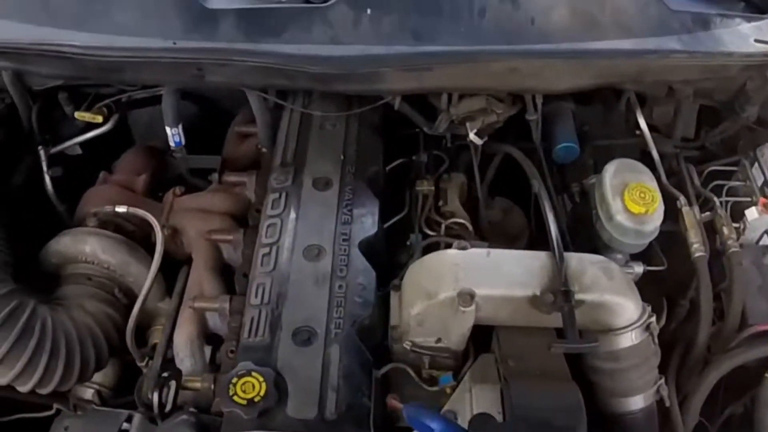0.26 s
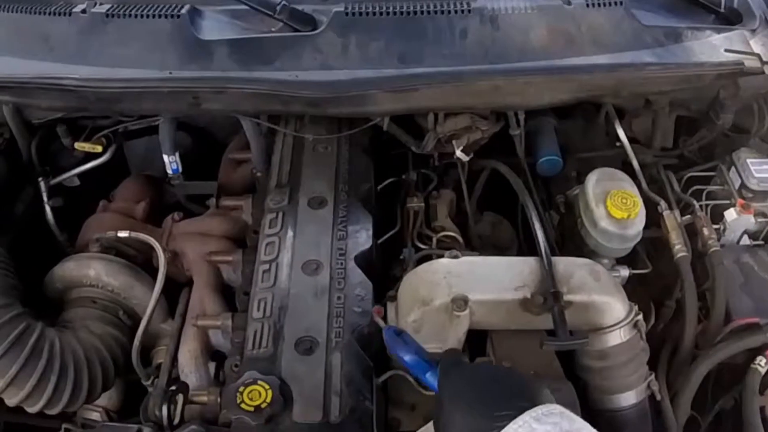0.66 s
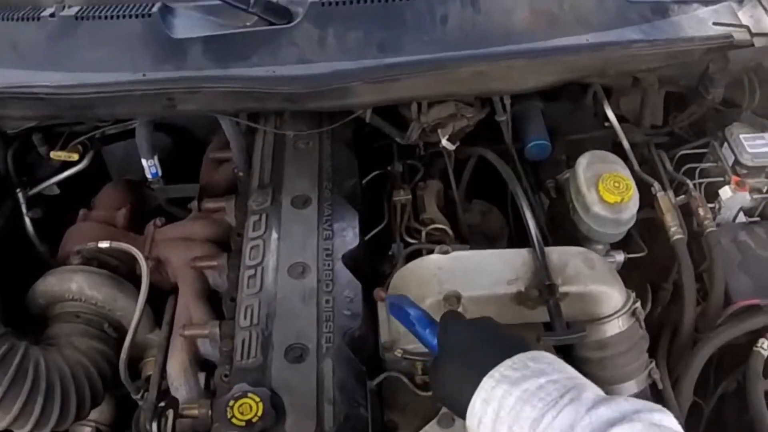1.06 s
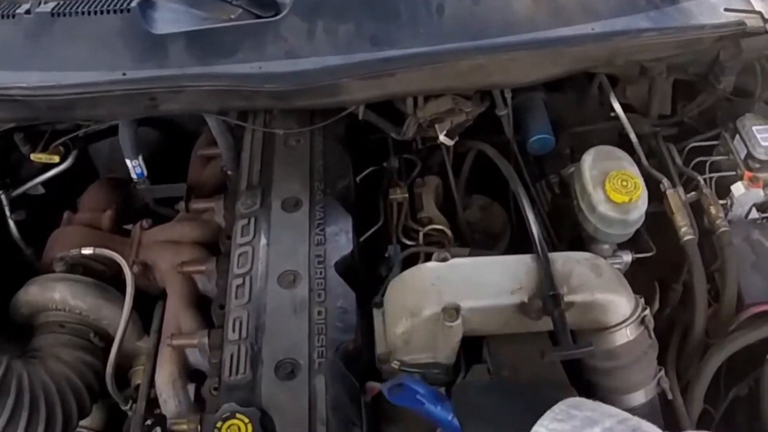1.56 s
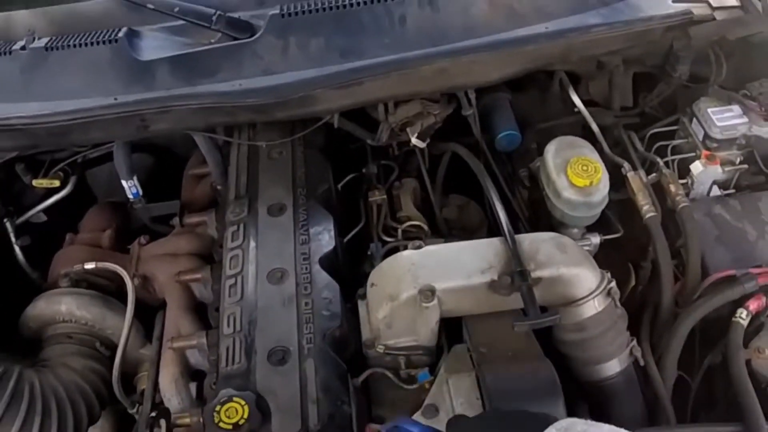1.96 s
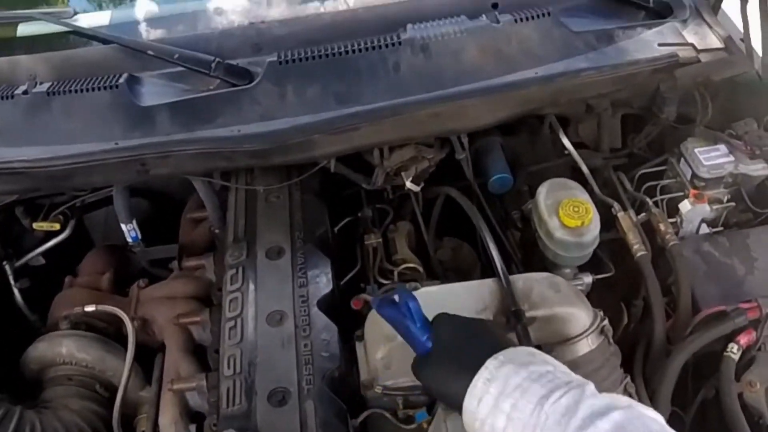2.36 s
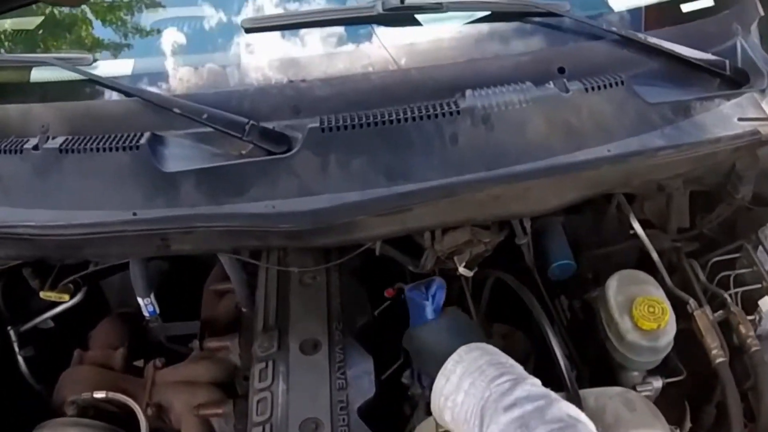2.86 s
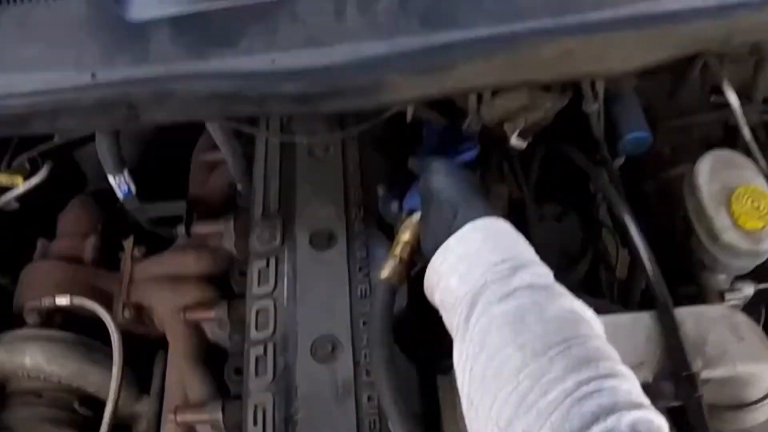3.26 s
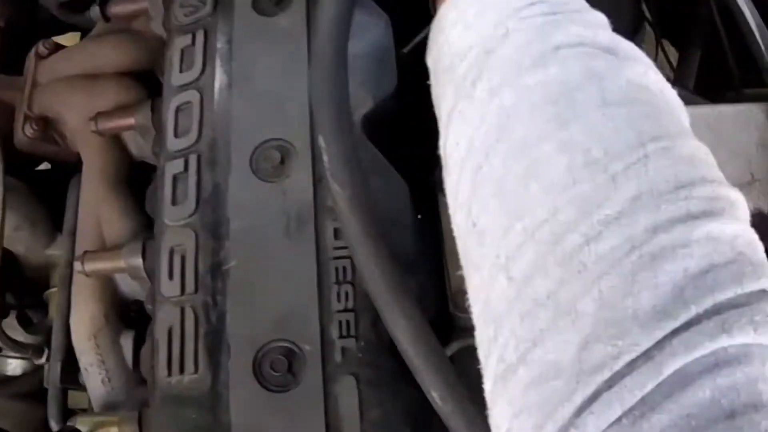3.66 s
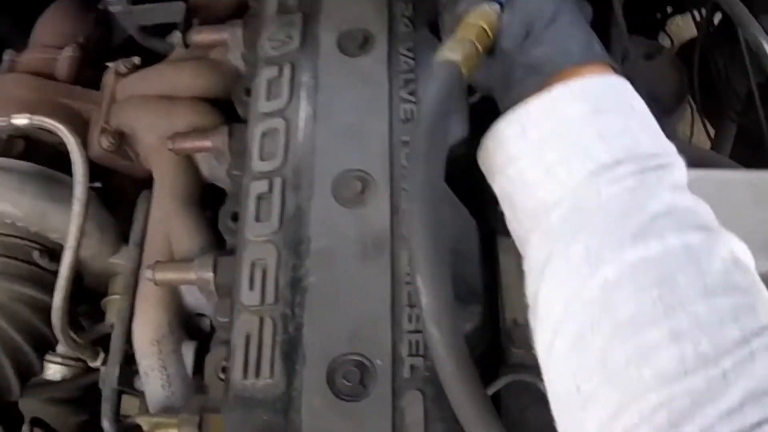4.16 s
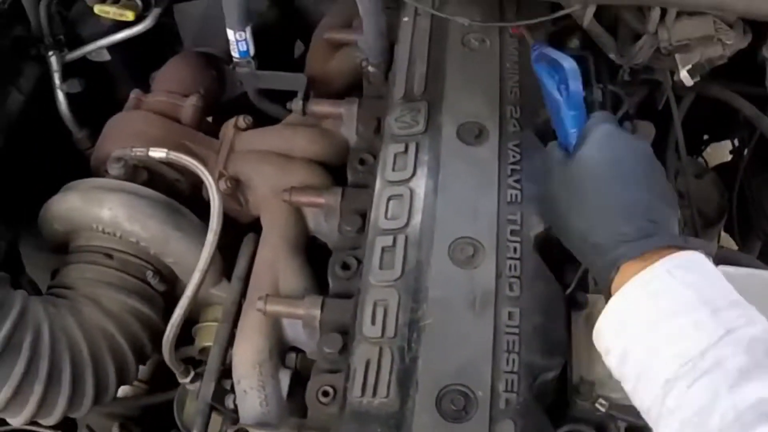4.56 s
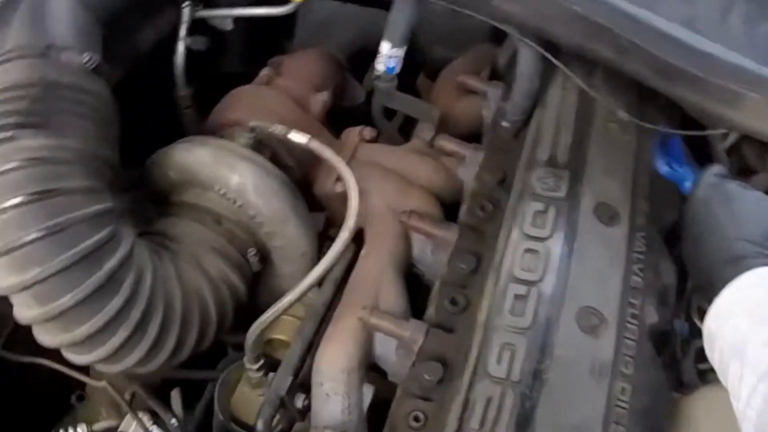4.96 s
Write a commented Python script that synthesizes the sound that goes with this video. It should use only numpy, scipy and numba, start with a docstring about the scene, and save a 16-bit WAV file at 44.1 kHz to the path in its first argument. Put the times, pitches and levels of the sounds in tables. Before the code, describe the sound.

Close, continuous air blasts sweep across metal engine parts, fluttering between sharp hiss and hollow roar, with small pops, grit ticks and late rumble.

```python
"""Air gun over an engine

A compressed-air blow gun is swept in strokes and flicks over a truck engine, an arm's length from a small camera.
Shaped noise makes its hiss at the nozzle, its rush on metal and its roar in the hollows between the parts.
Later it is pushed deep behind the valve cover: the roar drops in pitch and low noise buffets the microphone.
Sparse impulses tick like loosened grit, and delayed copies with wandering paths are echoes off nearby metal.
Short tuned flares and brief swelling tones mark edges and pockets; three times the level dips briefly."""
import sys
import numpy as np
from scipy import signal
from scipy.fft import rfft, irfft, next_fast_len
from scipy.io import wavfile
from scipy.ndimage import uniform_filter1d
from numba import njit

SR = 44100
rng = np.random.default_rng(int(sys.argv[2]) if len(sys.argv) > 2 else 0)


def output_pcm(signal):
    """Save a mono or channel-first signal as 16-bit PCM at the path in sys.argv[1].

    Samples are clipped to [-1, 1] before scaling.
    """
    pcm = np.clip(np.atleast_2d(signal).T, -1, 1) * 32767
    wavfile.write(sys.argv[1], SR, np.round(pcm).astype(np.int16))


N = 229981
TIME = np.arange(N) / SR  # seconds
FFT_SIZE = next_fast_len(N, real=True)
BIN_HZ = np.maximum(np.arange(FFT_SIZE // 2 + 1) * SR / FFT_SIZE, 1)


def undb(db):
    """Decibels to gain."""
    return 10 ** (np.asarray(db) / 20)


def curves(table):
    """Each column of a table, joined by straight lines in time."""
    s, *columns = np.transpose(table)
    return [np.interp(TIME, s, column) for column in columns]


def unit(x):
    """Scale to an rms of one."""
    return x / np.sqrt(np.mean(x ** 2))


def steady(x):
    """Hold the slow level of the mid channel at one, averaged over about 0.2 s."""
    return x / np.sqrt(uniform_filter1d(x[0] ** 2, size=9000))


def swell(s, half_length):
    """A rounded (Gaussian) rise and fall about the time s."""
    distance = np.minimum(np.abs(TIME - s) / half_length, 10)
    return np.exp(-.5 * distance ** 2)


def walk(rate):
    """Smooth random wandering with a spread of one and about `rate` turns a second."""
    slow = rfft(rng.standard_normal(FFT_SIZE)) / (1 + (BIN_HZ / rate) ** 4)
    return unit(irfft(slow, FFT_SIZE)[:N])


def colour(x, spectrum):
    """Filter by (Hz, dB) points joined on a log-frequency axis."""
    hz, db = np.transpose(spectrum)
    gain = undb(np.interp(np.log(BIN_HZ), np.log(hz), db))
    return irfft(rfft(x, FFT_SIZE) * gain, FFT_SIZE)[..., :N]


@njit
def band(x, hz, width):
    """State-variable band-pass with a moving centre, gain one at the centre."""
    y = np.empty_like(x)
    for c in range(len(x)):
        b, low = 0., 0.
        for i in range(len(hz)):
            g, k = np.tan(np.pi * hz[i] / SR), width / hz[i]
            v = (b + g * (x[c, i] - low)) / (1 + g * (g + k))
            b, low, y[c, i] = 2 * v - b, low + 2 * g * v, k * v
    return y


def bell(x, hz, width_hz, db):
    """Raise or lower a band; its centre and gain may move."""
    return x + (undb(db) - 1) * band(x, hz * np.ones(N), float(width_hz))


# Stereo width of the raw noise. Each row: frequency in Hz, side relative to mid in dB.
WIDTH = [(30, -23), (100, -10), (600, -15.5), (3000, -19.5), (8000, -16), (15000, -13)]


def turbulence():
    """Mid and side noise: the two microphone ports hear nearly the same eddies."""
    mid, side = rng.standard_normal((2, N))
    return np.array([mid, colour(side, WIDTH)])


def voiced(x, spectra, place):
    """Pass x through the resonances of each place, blending as the nozzle moves between them."""
    out = 0
    for k, spectrum in enumerate(spectra):
        sound = colour(x, spectrum)
        nearness = np.clip(1 - np.abs(place - k), 0, 1)
        out = out + nearness * sound / sound[0].std()
    return out


def glance(x, lag_s, sway, share, rate):
    """Add an echo off nearby metal; its path wanders, so a comb of peaks slides about."""
    late = TIME - lag_s * np.exp(sway * walk(rate))
    echo = np.array([np.interp(late, TIME, channel) for channel in x])
    return (x + share * echo) / np.sqrt(1 + share ** 2)


def scatter(x, patchy_db, size=512):
    """Many small parts scatter the sound: narrow bands swell and fade at random."""
    spectrum = signal.stft(x, nperseg=size)[2]
    field = rng.standard_normal(spectrum.shape[1:])
    for _ in range(2):
        field = uniform_filter1d(field, size=2, axis=0)   # across frequency
        field = uniform_filter1d(field, size=11, axis=1)  # across time
    patches = undb(patchy_db * unit(field))
    return signal.istft(spectrum * patches)[1][:, :N]


def stroke(start, length, attack_s, release_s):
    """Envelope of one stroke: the jet swings on, holds and slides off."""
    rise = .5 + .5 * np.tanh((TIME - start) / attack_s)
    return rise * np.exp(-np.clip((TIME - start - length) / release_s, 0, 20))


# Levels in these three tables come before the flutter and small trims of each layer.
# The jet between strokes, grazing the parts. Each row: time in seconds, rush level in dB, roar level in dB.
GRAZE = [(0.0, -23.5, -23.5), (0.28, -30.5, -38.5), (0.33, -30, -28), (0.46, -30.0, -30),
         (0.77, -25.5, -21), (1.51, -23, -26), (2.02, -30, -31), (2.63, -26.5, -25.0), (3.1, -21, -23.5),
         (3.22, -26.0, -40.0), (3.31, -35, -36), (3.51, -28.5, -26), (3.75, -27, -27.5),
         (4.36, -23.5, -21.0), (4.65, -30.5, -30), (4.92, -36.5, -28), (5.2, -30.5, -23.5)]
# Strokes over the engine. Each row: start in seconds, length in seconds, rush, hiss and roar levels in dB.
STROKES = [(0.023, 0.028, -21, -26.0, -30), (0.131, 0.089, -21.5, -26, -25.5),
           (0.538, 0.17, -20.5, -28, -20), (0.767, 0.27, -24.5, -37, -20), (1.05, 0.18, -26, -49, -23.0),
           (1.247, 0.11, -20.5, -33.5, -46), (1.53, 0.35, -22, -27, -38), (1.927, 0.056, -20.5, -24, -29.5),
           (2.152, 0.17, -27.5, -36, -20.5), (2.402, 0.089, -33.0, -32, -20.5),
           (2.706, 0.18, -23.5, -27.5, -34), (2.99, 0.11, -22, -35, -43),
           (3.525, 0.15, -23.5, -27.0, -25.5), (3.822, 0.16, -21.5, -25.5, -24.5),
           (3.98, 0.097, -37, -33, -26.5), (4.099, 0.15, -28.5, -23, -24.5),
           (4.406, 0.19, -29.0, -39.5, -20.5), (4.729, 0.056, -25.5, -31, -18.5),
           (4.947, 0.022, -25.5, -27.5, -17.5), (5.144, 0.09, -26.5, -38, -17.5)]
# Quick flicks of the wrist that miss the hollows.
# Each row: centre in seconds, rush level in dB, hiss level in dB.
FLICKS = [(0.095, -29, -23), (0.276, -41, -27.5), (0.628, -26, -40), (0.983, -24.5, -41),
          (1.144, -19.5, -26), (1.335, -27, -27), (1.448, -20, -31.5), (1.634, -19.5, -34),
          (1.831, -22.5, -32.5), (2.003, -26, -21.5), (2.139, -22.5, -19.5), (2.198, -23.5, -23.5),
          (2.34, -19.5, -21), (3.149, -19.5, -25), (3.186, -22, -25), (3.659, -19.5, -23),
          (3.957, -31, -32), (4.469, -19.5, -25), (4.795, -26, -23)]
GRAZE_HISS_DB, GRAZE_HISS_DB_PER_PLACE = -5, 0.5  # nozzle hiss relative to the grazing rush
STROKE_ATTACK_S, STROKE_RELEASE_S = 0.016, 0.016
ROAR_ATTACK_S, ROAR_RELEASE_S = 0.017, 0.0099


def sweep(place):
    """Levels in dB of rush, hiss and roar: strokes and flicks add their power to the grazing jet."""
    rush_db, roar_db = curves(GRAZE)
    hiss_db = rush_db + GRAZE_HISS_DB + GRAZE_HISS_DB_PER_PLACE * place
    rush, hiss, roar = undb([rush_db, hiss_db, roar_db]) ** 2
    for start, length, rush_db, hiss_db, roar_db in STROKES:
        on_metal = stroke(start, length, STROKE_ATTACK_S, STROKE_RELEASE_S)
        in_hollow = stroke(start, length, ROAR_ATTACK_S, ROAR_RELEASE_S)
        rush += (undb(rush_db) * on_metal) ** 2
        hiss += (undb(hiss_db) * on_metal) ** 2
        roar += (undb(roar_db) * in_hollow) ** 2
    for s, rush_db, hiss_db in FLICKS:
        flick = swell(s, half_length=0.027)
        rush += (undb(rush_db) * flick) ** 2
        hiss += (undb(hiss_db) * flick) ** 2
    return 10 * np.log10([rush, hiss, roar])


def grit(per_second, spread_db):
    """Grains of dirt striking metal: many faint ticks and a few stronger ones."""
    struck = rng.random(N) < per_second / SR
    size = undb(spread_db * np.minimum(rng.exponential(size=N), 2))
    return unit(struck * size * rng.choice([-1, 1], N))


# Rush on the metal at the open top, in the gap and in the far corner.
# Each row: frequency in Hz, relative level in dB.
RUSH_TOP = [(1030, -35.5), (1750, -9), (1830, -17.5), (2140, -4), (2400, 0), (2630, -5.5), (2880, 2),
            (3170, -8), (3830, 3.5), (4050, 5.5), (5180, -10), (5820, -2), (6930, 1.5), (7790, -14),
            (8200, -20), (10700, -36), (18000, -120)]
RUSH_GAP = [(1030, -46), (1750, -34), (1900, -13.5), (2310, -4.5), (2790, -1), (3210, -17.5), (3660, -3),
            (4050, 0.5), (4730, -4), (5280, -19.5), (5780, 1), (6290, -13.5), (6890, -0.5), (7540, -11),
            (8200, -53), (10700, -49), (18000, -120)]
RUSH_CORNER = [(1030, -52), (1750, -26), (1970, -16), (2510, -1.5), (2820, -3.5), (3280, -16), (3520, 0),
               (4440, -1.5), (5150, -13), (5600, -5), (5900, 3), (6330, -8), (8200, -17), (10700, -43),
               (18000, -120)]
# Hiss of the nozzle at the same places. Each row: frequency in Hz, relative level in dB.
HISS_TOP = [(4710, -44), (8000, -7.5), (8650, -4), (9970, 5), (11300, 1.5), (12800, 7), (13700, 3.5),
            (15300, -3.5)]
HISS_GAP = [(4710, -22), (8000, 1), (8890, 2), (9860, 1), (11700, 4), (13000, 8.5), (15300, 3)]
HISS_CORNER = [(4710, -19), (8000, -9.5), (8750, -8), (9470, -25), (9620, -10), (11800, -7.5),
               (13500, -0.5), (15300, -15)]


def jet(rush_db, hiss_db, place, flutter):
    """The rush on the metal and the hiss of the nozzle, coloured by shifting echoes."""
    ticks = undb(-18.5) * grit(per_second=130, spread_db=8.5)
    air = turbulence() + ticks * np.array([[1], [0]])  # grit in the mid only
    air = glance(air, lag_s=0.000819, sway=0.175, share=0.31, rate=2.62)
    air = glance(air, lag_s=.0021, sway=0.086, share=0.41, rate=1.68)
    air = glance(air, lag_s=.0075, sway=.012, share=0.28, rate=2.15)  # the open bonnet, further off
    rush = voiced(scatter(air, patchy_db=1.2), [RUSH_TOP, RUSH_GAP, RUSH_CORNER], place)
    # a jet that misses the metal is mostly hiss, and its rush loses the low end
    rush = steady(bell(rush, 1900, 1800, 0.8 * (rush_db - hiss_db) + 0.6))
    # not held steady: the engine shades the hiss further in
    hiss = voiced(scatter(air, patchy_db=2), [HISS_TOP, HISS_GAP, HISS_CORNER], place)
    rush_gain = undb(rush_db + 0.71 * flutter + .5 * walk(25))
    hiss_gain = undb(hiss_db + 1.5 * flutter + .5 * walk(18) + 1.1)
    return rush * rush_gain + hiss * hiss_gain


# Gusts thrown straight back at the microphone.
# Each row: centre in seconds, level in dB before a random wander, half length in seconds.
GUSTS = [(0.242, -45, .03), (2.097, -41, 0.047), (2.454, -42, .04), (3.332, -31, 0.023),
         (3.574, -36, 0.049), (4.05, -50, .025), (4.226, -26, .01), (4.513, -31.5, 0.02),
         (4.752, -30.5, 0.049), (5.194, -19.5, 0.036)]
# The rest of the buffeting: base in dB, dB per dB of roar, dB per step deeper into the engine.
BUFFET_DB, BUFFET_PER_ROAR, BUFFET_DB_PER_PLACE = -32.5, 0.46, 3


def buffeting(roar_db, place):
    """Level in dB of the air that comes back at the microphone: a draught that follows the roar, plus gusts."""
    draught = undb(BUFFET_DB + BUFFET_PER_ROAR * roar_db + BUFFET_DB_PER_PLACE * place)
    gusts = sum((undb(db) * swell(s, length)) ** 2 for s, db, length in GUSTS)
    return 10 * np.log10(draught ** 2 + gusts)


# Roar of the hollows at the open top, in the gap and in the far corner.
# Each row: frequency in Hz, relative level in dB.
ROAR_TOP = [(210, -51), (350, -18), (461, -19.5), (517, -1.5), (643, -5), (796, 0.5), (1110, 1.5),
            (1230, -2.5), (1330, 0.5), (1590, -9), (1900, -13.5), (2470, -17), (4180, -120)]
ROAR_GAP = [(210, -14), (350, -6.5), (448, -9), (606, -5.5), (657, -11), (714, -3.5), (807, -8.5),
            (926, -4), (1300, -9), (1620, -36), (1800, -48), (2340, -59), (3960, -120)]
ROAR_CORNER = [(210, -20), (350, -5), (448, -10.5), (581, -4.5), (685, -11.5), (952, -2.5), (1110, -6),
               (1370, -8), (1800, -35), (2340, -81), (3960, -120)]
# The hollow that the jet is blowing into. Each row: time in seconds, resonance in Hz.
HOLLOW = [(0.0, 970), (0.32, 1030), (0.88, 880), (1.45, 1150), (1.9, 900), (2.02, 975), (2.18, 795),
          (2.35, 940), (2.55, 880), (2.7, 1200), (3.0, 1270), (3.38, 1160), (3.57, 980), (4.0, 820),
          (4.3, 940), (5.06, 890), (5.21, 750)]
# Buffeting of the air thrown back. Each row: frequency in Hz, relative level in dB.
BUFFET = [(12, -43), (20, -10), (70, -8.5), (177, 0), (231, -5), (293, -2.5), (373, -2.5), (449, -3),
          (480, -1), (620, -7), (1060, -120)]


def hollows(roar_db, place, flutter):
    """Eddies drive the hollows unevenly, and air thrown back shakes the microphone."""
    hollow_hz, = curves(HOLLOW)
    air = glance(turbulence(), lag_s=0.00447, sway=0.172, share=0.56, rate=1.83)
    roar = voiced(air, [ROAR_TOP, ROAR_GAP, ROAR_CORNER], place)
    roar = bell(roar, hollow_hz, 540, 11.0)
    # a smaller hollow rings higher and gives little below its resonance
    roar = steady(bell(roar, 720, 430, -12 * np.log2(hollow_hz / 980)))
    # from the gap the air comes straight back and rumbles more
    in_gap = 1 - np.abs(place - 1)
    rumble_db = -3 + 4 * in_gap - 8 * np.maximum(place - 1, 0)
    buffet = steady(bell(colour(turbulence(), BUFFET), 51, 75, rumble_db))
    roar_gain = undb(roar_db + 1.28 * flutter + walk(53) + 0.56)
    buffet_gain = undb(buffeting(roar_db, place) + 1.6 * walk(26))
    return roar * roar_gain + buffet * buffet_gain


# Narrow bands that are nearly missing or thinned.
# Each row: centre at the open top in Hz, width in Hz, gain at the centre in dB, shift in Hz per place.
NOTCHES = [(3094, 95, -28, 220), (5300, 190, -32, 10), (8240, 730, -2, 1160)]


def notched(x, place):
    """Lower narrow bands of the sound; their centres drift slowly and shift with place."""
    for hz, width_hz, db, rise_hz in NOTCHES:
        centre_hz = (hz + rise_hz * place) * np.exp(0.007 * walk(2.1))
        x = bell(x, centre_hz, width_hz, db)
    return x


# The jet crosses an edge or a hole and flares. Each row: centre in seconds, level in dB,
# half length in seconds, centre in Hz, width of the first of two band-passes in Hz.
SPITS = [(0.087, -20.5, 0.058, 6230, 1210), (0.287, -24, 0.016, 6400, 1200),
         (0.339, -21.5, 0.0061, 2740, 600), (.39, -22.5, 0.0057, 2860, 1210),
         (0.519, -22, 0.0052, 2640, 700), (1.32, -17.5, 0.017, 6960, 1000), (1.617, -16, 0.0037, 4200, 600),
         (1.91, -20, 0.017, 11500, 3500), (2.253, -23, 0.033, 860, 240), (2.457, -25.5, 0.026, 2260, 500),
         (3.016, -27.5, 0.044, 1900, 900), (3.372, -22, 0.002, 2000, 3000), (3.378, -34, 0.006, 4200, 4000),
         (3.42, -36.5, 0.1, 370, 200), (3.607, -30.5, 0.038, 357, 249), (3.624, -31, 0.027, 177, 70),
         (4.229, -32, .008, 90, 90), (4.715, -9, 0.0015, 3700, 3220), (4.717, -21, 0.0078, 11600, 8000),
         (4.74, -31, 0.02, 2710, 900)]


def spits():
    """Short flares of air, each tuned by the edge or hole that is hit."""
    air, out = turbulence(), np.zeros((2, N))
    for s, db, length, hz, width_hz in SPITS:
        near = np.abs(TIME - s) < 4 * length
        centre = np.full(near.sum(), float(hz))
        ring = band(np.ascontiguousarray(air[:, near]), centre, float(width_hz))
        ring = band(ring, centre, 2. * width_hz)
        envelope = np.exp(-.5 * ((TIME[near] - s) / length) ** 2)
        out[:, near] += ring / ring[0].std() * undb(db) * envelope
    return out


# The jet catches a pocket and pops it.
# Each row: centre in seconds, peak in the mid in dB, pitch in Hz, swell time in seconds.
POPS = [(0.2316, -11.5, 970, 0.0014), (0.2355, -4, 1010, 0.00079), (0.2397, -12, 990, 0.00061),
        (3.337, -31, 357, 0.0077), (3.525, -12, 970, 0.0013), (3.533, -10, 940, 0.0013),
        (3.604, -10, 920, 0.0021), (4.219, -13, 195, 0.0014), (4.758, -21, 180, 0.0057)]


def pops():
    """A pocket rings briefly as the jet crosses its mouth: a tone under a rounded swell."""
    out = np.zeros(N)
    for s, db, hz, swell_s in POPS:
        age = TIME - s
        envelope = np.exp(-.5 * (age / swell_s) ** 2)
        out += undb(db) * envelope * np.cos(2 * np.pi * hz * age)
    return out


# The level drops abruptly and swells back.
# Each row: start in seconds, gain at the drop in dB, recovery in seconds.
DIPS = [(.6505, -14, .007), (.693, -13, .008), (.736, -15, .009)]


def dips():
    """Gain of three brief dips: a sudden drop and a quick swell back."""
    db = 0
    for s, depth_db, recovery in DIPS:
        db = db + depth_db * (TIME >= s) * np.exp(-((TIME - s) / recovery) ** 2)
    return undb(db)


# Where the nozzle points. Each row: time in seconds, place (0 open top of the engine,
# 1 gap behind the valve cover, 2 far corner; fractions lie between, above 2 is deeper still).
PLACE = [(0, 0.0012), (3.15, 0.031), (3.45, 0.82), (4.45, 0.6), (4.9, 2.43), (5.21, 1.9)]
# Direction of the jet. Each row: time in seconds, left minus right gain in dB.
PAN = [(0.0, -1.5), (3.25, -1.0), (3.71, -2), (5.12, -0.5), (5.21, -1.5)]


def scene():
    """One unsteady jet drives rush, hiss and roar, with flares and pops on top, slightly to the right."""
    place, = curves(PLACE)
    pan_db, = curves(PAN)
    flutter = walk(23)
    rush_db, hiss_db, roar_db = sweep(place)
    roar = hollows(roar_db, place, flutter)
    # from the far corner the roar reaches both ports alike
    roar[1] *= undb(-3.5 * np.maximum(place - 1, 0))
    air = jet(rush_db, hiss_db, place, flutter) + roar + spits()
    mid, side = notched(air, place) * dips()
    mid = mid + pops()
    side = side * undb(0.81 * walk(3.7) + 0.3)  # the width wanders
    stereo = np.array([mid + side, mid - side])
    return stereo * undb(np.array([[1], [-1]]) * pan_db / 2)


TOP_HZ = 15250  # edge of the low-pass


def record(dry):
    """The camera rounds the tallest peaks and cuts the top."""
    rounded = dry / (1 + (dry / .85) ** 4) ** .25
    low_pass = signal.ellip(10, .2, 80, TOP_HZ, fs=SR, output="sos")
    return signal.sosfilt(low_pass, rounded)


dry = scene()
out = record(dry)
output_pcm(out)
```